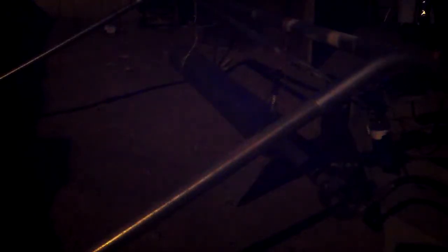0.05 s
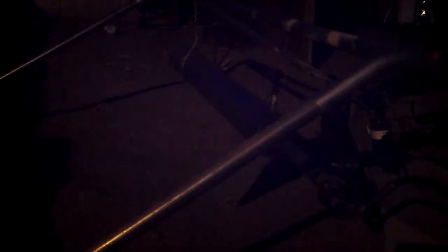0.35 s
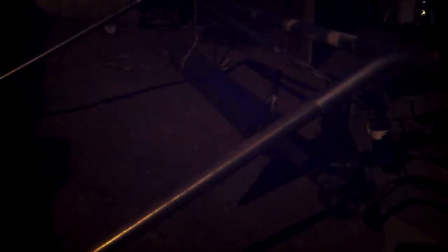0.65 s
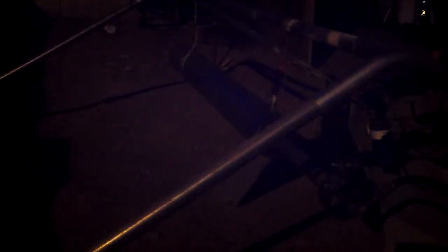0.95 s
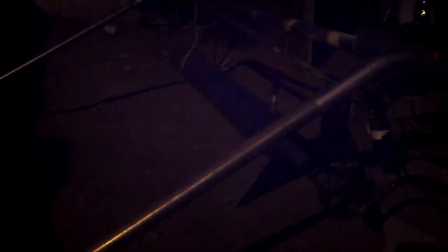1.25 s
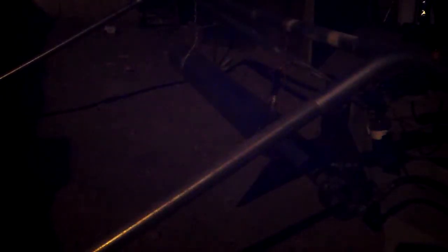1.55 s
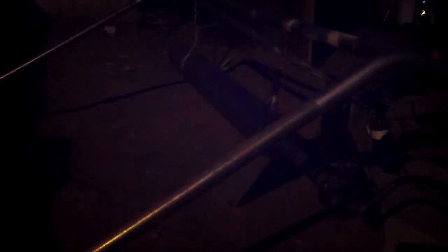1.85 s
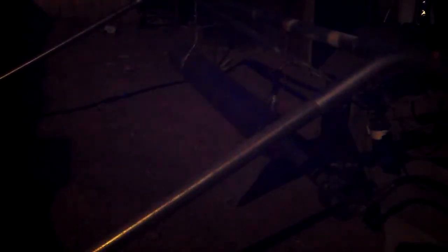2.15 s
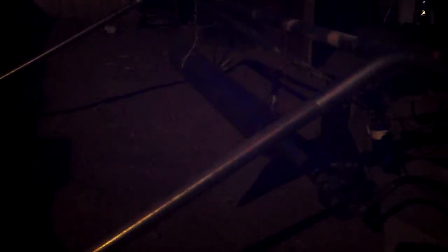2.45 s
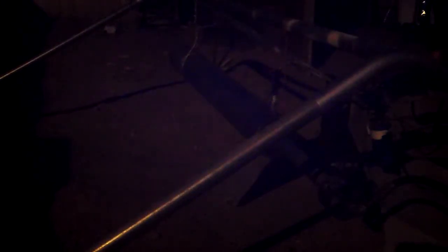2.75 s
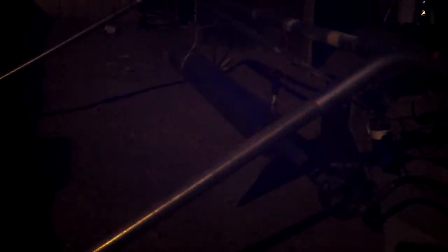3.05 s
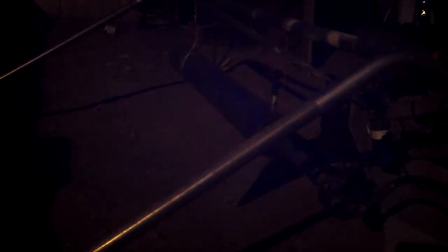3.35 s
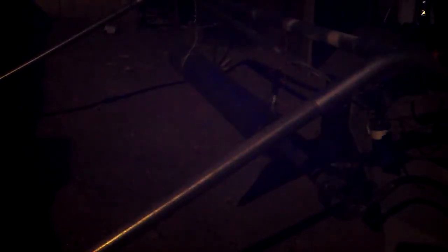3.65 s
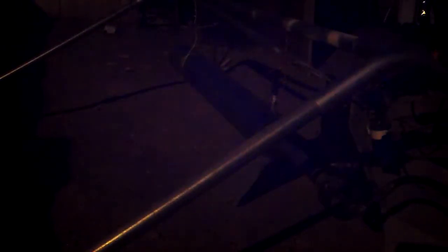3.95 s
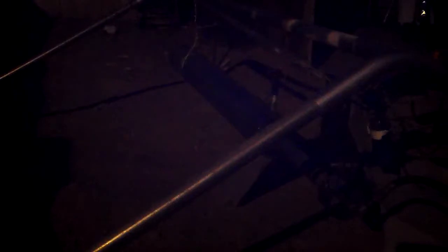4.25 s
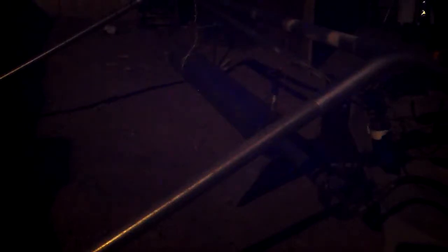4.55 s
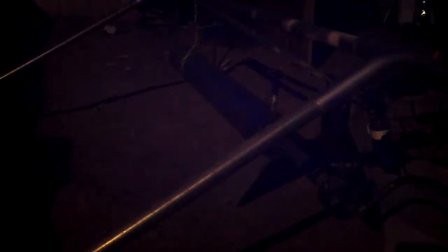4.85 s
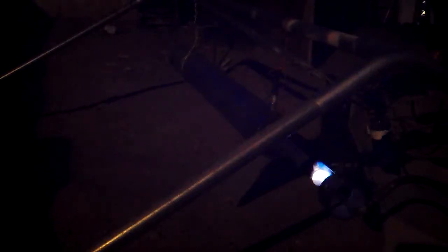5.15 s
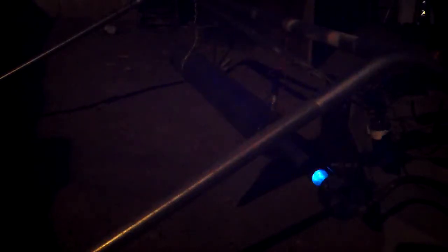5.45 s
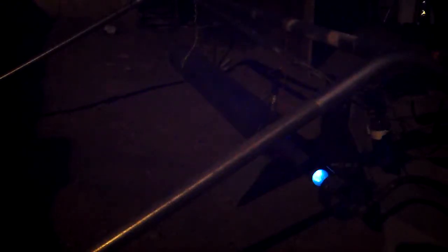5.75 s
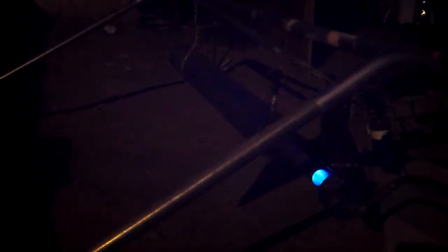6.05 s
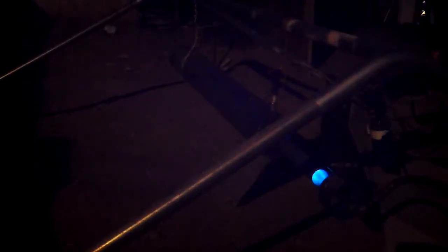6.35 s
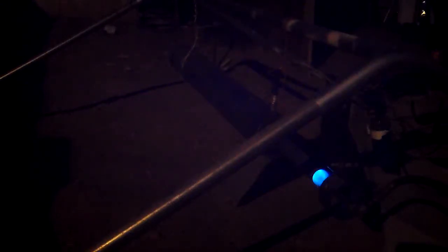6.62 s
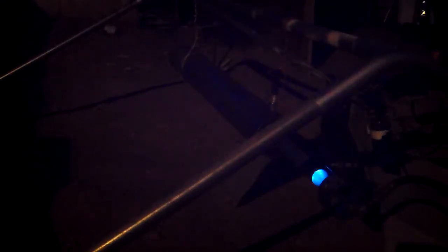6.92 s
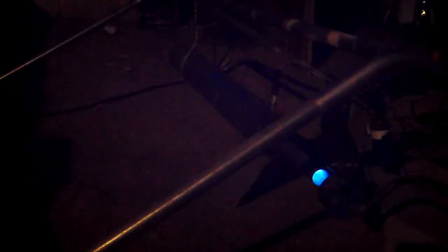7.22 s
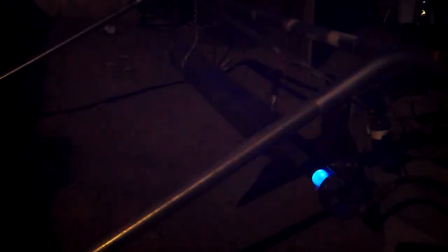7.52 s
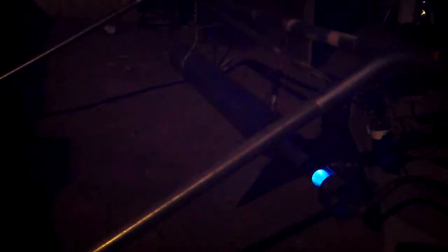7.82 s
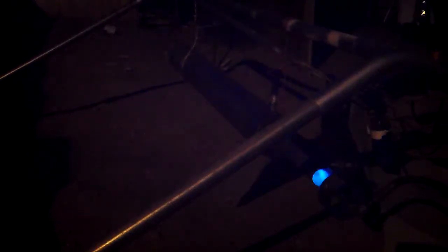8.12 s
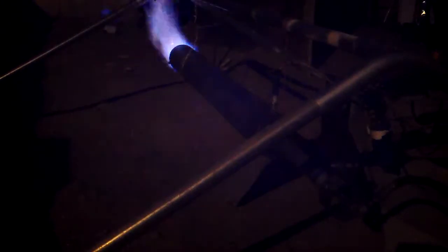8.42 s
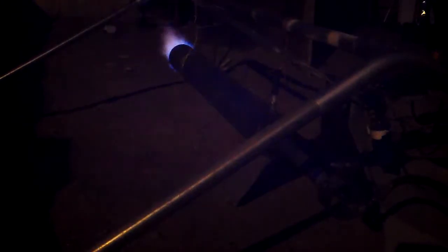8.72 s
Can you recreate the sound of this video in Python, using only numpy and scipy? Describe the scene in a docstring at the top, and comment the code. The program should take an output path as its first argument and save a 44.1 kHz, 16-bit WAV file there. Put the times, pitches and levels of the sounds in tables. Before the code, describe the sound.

Faint room noise and soft puffs of gas come first in a quiet workshop. A little past halfway, a gas pulse motor catches with a thump and a short whoop, then roars with a raspy flutter, getting louder and throbbing as the feed opens. The flame dies, gas rushes briefly, and a sharp bang overloads the microphone. The steel pipe then fires in short, low humming bursts over hiss.

```python
"""A quiet workshop, where a valveless gas pulse motor, a steel pipe, is started.
Unlit gas puffs and hoots, lights with a thump and a whoop, then burns inside the pipe with a
fluttering roar that grows as the feed is opened. The flame blows out, the pipe fills and fires
with a bang that chokes the microphone, then pulses on its lowest note."""
import sys
import numpy as np
from scipy import signal
from scipy.fft import rfft, irfft, next_fast_len
from scipy.io import wavfile

SR = 44100
rng = np.random.default_rng(int(sys.argv[2]) if len(sys.argv) > 2 else 0)


def wav_out(sig):
    """Save sig, one row per channel (or a flat mono array), as 16-bit PCM at SR to the path in sys.argv[1]."""
    wavfile.write(sys.argv[1], SR, np.round(np.clip(np.atleast_2d(sig).T, -1, 1) * 32767).astype(np.int16))


N = 396018
TIME = np.arange(N) / SR
LIT_S, FLAME_OUT_S, BANG_S = 5.33, 8.285, 8.4592


def from_db(db):
    """Decibels to gain."""
    return 10 ** (np.asarray(db) / 20)


def rms_one(x):
    """Scale to unit rms."""
    return x / np.sqrt(np.mean(x ** 2) + 1e-20)


def between(start, end, fade):
    """A gate, fully open from start to end, with straight fades outside."""
    return np.clip(1 + np.minimum(TIME - start, end - TIME) / fade, 0, 1)


def swell(middle, length):
    """A smooth rise and fall around a moment."""
    return np.exp(-2 * ((TIME - middle) / length) ** 2)


def decay(start, seconds):
    """Instant attack, exponential tail."""
    return (TIME >= start) * np.exp(-np.maximum(TIME - start, 0) / seconds)


def noise(colour):
    """Unit-rms noise through an EQ curve, rolled off beyond both ends."""
    hz, db = np.transpose(colour)
    f = np.maximum(np.arange(N // 2 + 1) * SR / N, 1)
    gain = from_db(np.interp(np.log(f), np.log(hz), db))
    skirts = np.minimum(f / hz[0], 1) ** 2 * np.minimum(hz[-1] / f, 1) ** 2
    return rms_one(irfft(rfft(rng.standard_normal(N)) * gain * skirts, N))


def drift(rate_hz, order=2):
    """A random modulator of unit rms, rolled off above the rate."""
    size = next_fast_len(N // 8 + 2)
    f = np.arange(size // 2 + 1) * SR / 8 / size
    slow = irfft(rfft(rng.standard_normal(size)) / (1 + (f / rate_hz) ** order), size)
    return np.interp(np.arange(N) / 8, np.arange(size), rms_one(slow))


def phase_of(hz):
    """Running phase of a frequency, in radians."""
    return 2 * np.pi * np.cumsum(hz + np.zeros(N)) / SR


def soft_note(hz):
    """A slightly unsteady tone of unit rms."""
    return np.sqrt(2) * np.sin(phase_of(hz * (1 + 0.0081 * drift(25))))


def resonance(hz, width, order=2):
    """A mode stirred by turbulence: a tone of random strength and phase."""
    phase = phase_of(hz)
    return rms_one(drift(width / 2, order) * np.cos(phase) + drift(width / 2, order) * np.sin(phase))


def ringing(modes):
    """Several stirred modes together."""
    return sum(from_db(db) * resonance(hz, width) for hz, width, db in modes)


def flutter(cycle, depth_db):
    """A tremolo that swells once per flame cycle."""
    return rms_one(from_db(depth_db * np.cos(cycle)))


def workshop_reverb(x, t60_s=0.27, wet_db=-8, band_hz=(200, 4500)):
    """Add the dull, short reverberation of the room."""
    t = np.arange(SR // 2) / SR
    tail = rng.standard_normal(len(t)) * from_db(-60 * t / t60_s) * (t > .004)
    walls = signal.butter(1, band_hz, "band", fs=SR, output="sos")
    tail = signal.sosfilt(walls, tail / np.linalg.norm(tail))
    return x + from_db(wet_db) * signal.fftconvolve(x, tail)[:N]


# EQ of the room's air and of its low rumble: (frequency [Hz], relative level [dB])
AIR_EQ = [(110, -13), (250, -5.5), (330, -8.5), (550, -4.5), (1000, -3), (1900, -15.5), (3300, -19),
          (5600, -23.5), (6400, -22), (9300, -21.5), (10300, -15), (11900, -18.5), (12400, -25),
          (15500, -31)]
RUMBLE_EQ = [(18, -4), (42, -5.5), (70, -8), (110, -9.5), (170, -16), (300, -31.5)]
# swells in the low end: (centre [s], length [s], frequency [Hz], bandwidth [Hz], level [dB])
RUMBLE_SWELLS = [(1.15, .3, 97, 17, -53), (1.597, 0.57, 40, 25, -51.5), (4.3, 1.3, 61, 12, -56),
                 (5.2, 0.18, 125, 22, -58)]
def room_tone():
    """The bed: air that lifts gently once, uneven rumble and mains hum."""
    air_db = -53 + 1.5 * swell(2.2, length=1.2)
    swells = sum(from_db(db) * swell(s, length) * resonance(hz, width)
                 for s, length, hz, width, db in RUMBLE_SWELLS)
    hum = from_db(-65) * soft_note(hz=124)
    return from_db(air_db) * noise(AIR_EQ) + from_db(-56.5) * noise(RUMBLE_EQ) + swells + hum


def electronics_whine():
    """A thin tone that flips polarity sixty times a second, and a fainter steady one above."""
    polarity = np.tanh(14 * np.sin(phase_of(30)))
    return from_db(-56.5) * np.sin(phase_of(7867)) * polarity + from_db(-68) * np.sin(phase_of(11046))


# EQ of the jet's hiss: (frequency [Hz], relative level [dB])
JET_EQ = [(1200, -1.5), (3000, -3.5), (3900, -4), (4800, -3), (5500, -8.5), (6400, 0), (7100, -8.5),
          (8200, -3), (10600, 1), (11800, -8), (13500, -11), (15700, -17)]
# puffs of gas before lighting: (centre [s], length [s], level [dB])
GAS_PUFFS = [(1.914, 0.32, -61), (4.912, 0.53, -58.5)]
# unlit gas rushing through the pipe: (frequency [Hz], bandwidth [Hz], level [dB])
RUSH_MODES = [(124.3, 44, -36.5), (600, 49, -42.5), (990, 900, -44.5), (1866, 70, -45.5),
              (3130, 250, -51.5)]
def gas_jet(cycle, feed_db):
    """The jet hisses, pinched by each flame surge; once the flame is out the bare pipe resonates."""
    unlit = between(FLAME_OUT_S + 0.038, TIME[-1], fade=0.032)
    pinch = flutter(cycle, depth_db=2) * from_db(1.95 * drift(25))
    burning = from_db(-38 + 1.075 * feed_db) * pinch * (TIME > LIT_S) * (1 - unlit)
    puffs = sum(from_db(db) * swell(s, length) for s, length, db in GAS_PUFFS)
    hiss = (puffs + burning + from_db(-42.5) * unlit) * noise(JET_EQ)
    return hiss + unlit * ringing(RUSH_MODES)


# thin whistles of the gas line: (frequency [Hz], bandwidth [Hz], resting level [dB])
LINE_WHISTLES = [(2912, 28, -75), (3030, 27, -73), (3530, 140, -75.5), (6360, 110, -79), (13850, 400, -77)]
def gas_line(puff_lift_db=2):
    """The gas line whistles faintly throughout and lifts with each puff."""
    puffing = sum(swell(s, length) for s, length, _ in GAS_PUFFS)
    return from_db(puff_lift_db * puffing) * ringing(LINE_WHISTLES)


# short gusts in the pipe: (centre [s], length [s], level [dB])
HOOT_GUSTS = [(4.775, 0.06, -52), (4.835, 0.026, -48), (4.902, 0.029, -47.5), (5.0, 0.072, -52.5)]
def cold_hoots():
    """Gusts of unlit gas blow one note in the cold pipe."""
    gusts = sum(from_db(db) * swell(s, length) for s, length, db in HOOT_GUSTS)
    return gusts * soft_note(hz=572)


def ignition_whoop(top_s=5.395, width_s=.085, rise_db_per_s=134, fall_db_per_s=120.5):
    """The fresh flame sounds the pipe's lowest note; level, then pitch, crests and sinks."""
    hz = 112.8 + 61 * np.exp(-((TIME - top_s) / width_s) ** 2)
    since_loudest = TIME - (top_s - 0.032)
    db = -34 + np.minimum(rise_db_per_s * since_loudest, -fall_db_per_s * since_loudest)
    return from_db(db) * soft_note(hz)


# the gas valve opens in stages: (time [s], turn length [s], feed gained [dB])
VALVE_TURNS = [(5.359, .4, 6), (6.001, .12, 7), (6.201, 0.205, 4.5), (7.48, .13, 10.5)]
def gas_feed():
    """The feed in dB, riding up to 0 at full: each turn of the valve adds its share."""
    return sum(db * (np.clip((TIME - s) / length, 0, 1) - 1) for s, length, db in VALVE_TURNS)


def surge_cycle(feed_db, full_feed_hz=74):
    """Phase of the flame's surges: a weak flame is slower and less regular."""
    jitter = 0.0856 - .009 * feed_db
    return phase_of(full_feed_hz * from_db(.2 * feed_db) * (1 + jitter * drift(35.32)))


# the pipe's low resonances: (frequency [Hz], bandwidth [Hz], relative level [dB])
BODY_MODES = [(477, 29, -10.5), (595, 134, -7), (715, 55, -3), (793, 40, 1.5), (887, 69, -0.5),
              (1062, 50, -6.5)]
# EQ of the flame's turbulence: (frequency [Hz], relative level [dB])
ROAR_EQ = [(100, -23), (220, 0), (300, -4), (385, 0.5), (435, -7), (540, 2), (980, 0), (1250, -20),
           (1650, -11), (2450, -21), (3300, -19.5), (3700, -26.5), (4800, -25), (7000, -41.5), (15000, -52)]
def flame_roar(cycle, strength, flare):
    """The body: turbulence, plus low modes and a wavering howl that ring out as the flame gets strong."""
    howl = np.sqrt(2) * np.sin(phase_of(948 + 17 * drift(30.4))) * from_db(3.8 * drift(25))
    modes = from_db(-0.8) * strength * rms_one(ringing(BODY_MODES))
    body = strength * (modes + from_db(-4) * howl) * flutter(cycle, depth_db=3)
    turbulence = noise(ROAR_EQ) * flutter(cycle, depth_db=2.5)
    return body * flare + from_db(-3.5) * turbulence * np.sqrt(flare)


# the pipe's high resonances: (frequency [Hz], bandwidth [Hz], relative level [dB])
BRIGHT_MODES = [(2930, 360, -6.5), (3354, 110, -16.5), (4340, 400, -26.5)]
def flame_pops(cycle, feed_db, strength, flare):
    """The bite: an upper pipe mode pops on each surge, and higher ones answer in between."""
    pop_hz = 2140 + 6.5 * feed_db
    chirp = np.sqrt(2) * np.sin(phase_of(pop_hz + 80 * drift(99.6)))
    rasp = from_db(-2.5) * resonance(pop_hz, width=354, order=4)
    pops = (chirp + rasp) * flutter(cycle, depth_db=9.5) * from_db(3.4 * drift(44))
    answers = sum(from_db(db) * resonance(hz, width, order=3) for hz, width, db in BRIGHT_MODES)
    answers *= flutter(cycle + np.pi, depth_db=4)
    return (from_db(-4.5) * pops + from_db(2.5 - 3.2 * strength) * answers) * np.sqrt(flare)


# EQ of the flame's chugging: (frequency [Hz], relative level [dB])
CHUG_EQ = [(20, -30), (55, -22), (76, -0.5), (105, -4.5), (145, -3.5), (220, -10.5), (400, -26)]
def flame_chug(cycle, strength):
    """The low end: rumble, and in a strong flame a throb and a narrow pressure dip on each surge."""
    throb = np.sin(cycle) + from_db(-4.5 + 2 * drift(31)) * np.sin(2 * cycle)
    rumble = from_db(-1) * noise(CHUG_EQ)
    dip = rms_one(np.exp(5.9 * (np.cos(cycle) - 1)))
    kicks = from_db(-3.5 + 2.5 * drift(40)) * (dip.mean() - dip)
    return rumble + strength ** 3 * (from_db(-6) * throb + kicks)


# flare-up accents: (time [s], boost [dB])
FLARE_UPS = [(5.484, 11), (6.063, 10.5), (6.29, 2.5), (6.381, 5.5), (6.899, 8), (6.972, 11), (7.095, 4),
             (7.249, 6.5), (7.611, 10), (7.76, 2.5), (8.179, 5), (8.26, 6)]
def flame(cycle, feed_db, gasp_db=4.5, gasp_s=.012):
    """The flame grows with the feed, gasps before each flare and strains just before it blows out."""
    flare_db = sum(db * decay(s, 0.012) - gasp_db * ((s - gasp_s < TIME) & (TIME < s))
                   for s, db in FLARE_UPS)
    flare = from_db(flare_db + 1.2 * drift(25))
    strain_db = 4 * np.exp(-np.abs(TIME - FLAME_OUT_S) / 0.15)
    roar_db = -25 + 0.65 * feed_db + strain_db
    strength = np.clip((roar_db + 52.5) / 26, 0, 1)
    roar = from_db(roar_db) * flame_roar(cycle, strength, flare)
    pops = from_db(-29.5 + 0.85 * feed_db + strain_db) * flame_pops(cycle, feed_db, strength, flare)
    chug = from_db(-27 + 0.85 * feed_db) * flame_chug(cycle, strength)
    return between(LIT_S, FLAME_OUT_S, fade=0.045) * (roar + pops + chug)


# two soft knocks, the lighting thump, the bang, then thumps of the overloaded microphone as it
# cuts out and recovers: (time [s], relative crack level [dB], crack decay [s], boom level [dB],
# boom pitch [Hz], boom decay [s])
HITS = [(1.351, -46.5, 0.015, -52, 111, .03), (3.288, -62, 0.018, -39, 95, .03),
        (5.265, -26.5, 0.021, -34, 45, .03), (5.298, -35.5, 0.011, -35, 110, 0.023),
        (8.461, -11.5, 0.006, -1, 105, 0.018), (8.467, -22, 0.0046, -14, 151, 0.0037),
        (8.477, -29, .003, 8, 195, 0.0072), (8.4891, -19, 0.0037, 5, 215, 0.0052),
        (8.512, -25, 0.03, -12.5, 71, 0.052)]
# EQ of the cracks: (frequency [Hz], relative level [dB])
CRACK_EQ = [(80, 9.5), (300, 0.5), (800, 4.5), (1300, -8), (2600, -7), (3800, -19), (7000, -30),
            (15000, -36)]
def thumps_and_bang():
    """Each hit is a noisy crack over a damped low swing; returns (cracks, booms)."""
    crack_envelope, booms = 0, 0
    for s, crack_db, crack_s, boom_db, boom_hz, boom_s in HITS:
        attack_s = crack_s / 10   # longer cracks also start more softly
        crack_envelope += from_db(crack_db + 2.5) * (decay(s, crack_s) - decay(s, attack_s))
        booms -= from_db(boom_db) * decay(s, boom_s) * np.sin(2 * np.pi * boom_hz * (TIME - s))
    # pressure builds as the flame runs down the pipe, then bursts out as a shock
    build_up = from_db(-11) * (TIME < BANG_S) * np.exp(-np.abs(TIME - BANG_S) / 0.0019)
    shock_eq = [(700, 2), (2700, -3.5), (4000, -10), (6200, -3), (10000, -7.5), (12500, -17)]
    shock = from_db(-9) * decay(BANG_S, 0.0026) * noise(shock_eq)
    return crack_envelope * noise(CRACK_EQ) + shock, booms + build_up


# fits of firing after the bang: (time [s], hold [s], level [dB])
FIRING_FITS = [(8.51, 0.036, -8.5), (8.61, 0.056, -15.5), (8.682, 0.0097, -18), (8.726, 0.032, -13.5),
               (8.781, .022, -13.5), (8.836, 0.13, -8)]
# EQ of the exhaust turbulence: (frequency [Hz], relative level [dB])
EXHAUST_EQ = [(20, -29), (60, -17), (120, 8.5), (210, 1.5), (300, -4), (440, -9), (580, -10), (700, -22.5),
              (900, -16.5), (1400, -32.5), (2800, -29), (4000, -52), (9000, -35.5), (13500, -41)]
def pulsing_pipe(hot_hz=172.4, cold_sag_hz=16.1, warm_up_s=0.0796, attack_s=0.0045, release_s=.014):
    """The pipe fires on its quarter-wave note, with its next odd mode and exhaust turbulence on top."""
    start = FIRING_FITS[0][0]
    hz = hot_hz - cold_sag_hz * decay(start, warm_up_s)   # starts flat, rises as the pipe heats
    firing = 0
    for s, hold, db in FIRING_FITS:
        attack = np.clip((TIME - s) / attack_s, 0, 1)
        release = np.exp(-np.maximum(TIME - s - hold, 0) / release_s)
        firing += from_db(db) * attack * release
    phase = phase_of(hz * (1 + 0.0314 * drift(48)))
    note = np.sqrt(2) * firing * from_db(0.72 * drift(54)) * np.sin(phase)
    overtone = from_db(-26.5) * resonance(522, width=35)
    exhaust = from_db(-18) * noise(EXHAUST_EQ)
    return (note + overtone + exhaust) * between(start, TIME[-1], fade=attack_s)


# the bang pins the microphone: (start [s], end [s])
MIC_CHOKES = [(8.474, 8.478), (8.482, 8.489), (8.495, 8.511)]
def scene():
    """Motor, gas and room at one microphone; each choke mutes all but a trace of the booms."""
    feed_db = gas_feed()
    cycle = surge_cycle(feed_db)
    cracks, booms = thumps_and_bang()
    mix = workshop_reverb(flame(cycle, feed_db)) + gas_jet(cycle, feed_db) + gas_line() + cold_hoots()
    mix += ignition_whoop() + pulsing_pipe() + cracks + room_tone() + electronics_whine()
    choked = np.clip(sum(between(start, end, fade=0.00074) for start, end in MIC_CHOKES), 0, 1)
    return (mix * (1 - choked) + booms * (1 - 0.89 * choked))[None]


def record(dry, ceiling=.71, cutoff_hz=15700):
    """A soft clip flattens the loudest swings, and a steep low-pass cuts the top."""
    clipped = dry / (1 + (dry / ceiling) ** 10) ** (1 / 10)
    return signal.sosfilt(signal.ellip(12, .1, 90, cutoff_hz, fs=SR, output="sos"), clipped)


dry = scene()
out = record(dry)
wav_out(out)
```